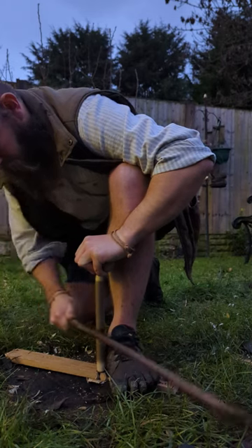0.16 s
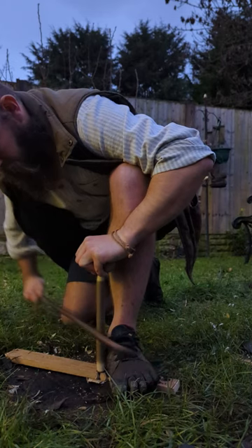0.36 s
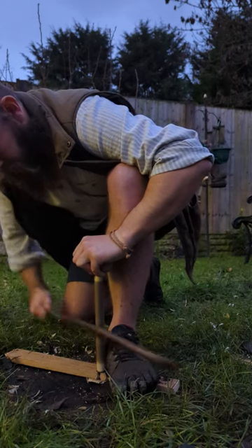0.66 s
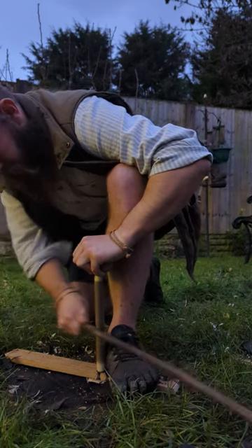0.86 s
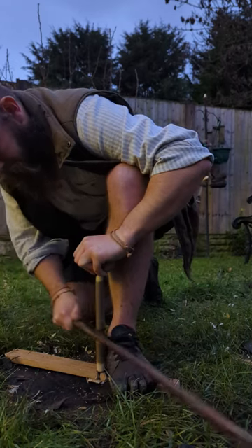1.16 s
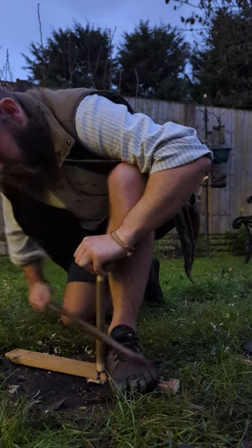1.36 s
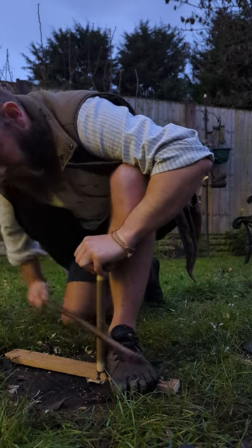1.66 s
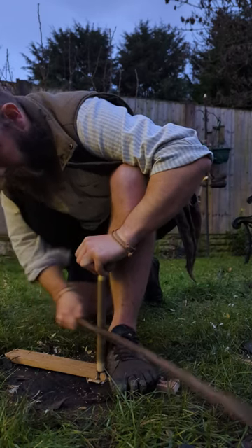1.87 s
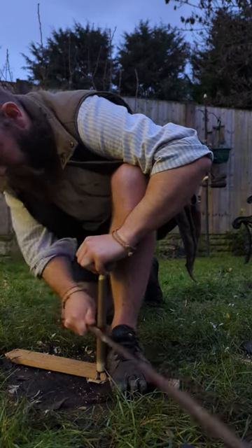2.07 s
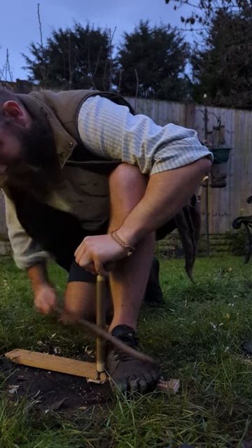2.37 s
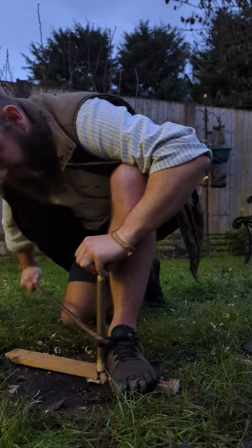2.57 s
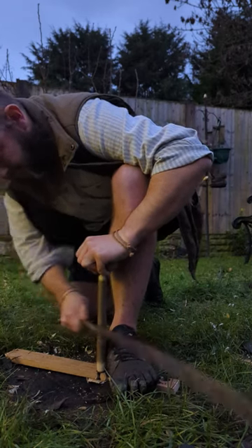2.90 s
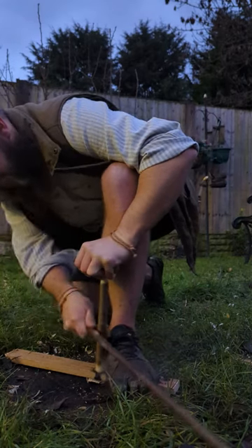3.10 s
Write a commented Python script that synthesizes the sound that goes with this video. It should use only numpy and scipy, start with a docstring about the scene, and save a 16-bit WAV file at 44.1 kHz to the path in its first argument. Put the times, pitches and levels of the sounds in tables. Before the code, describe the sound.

Close outdoor sound of a bow drill: dry, breathy wood rubbing swells and dips about twice a second, sometimes catching in clustered wooden clicks, slightly toward the right, over a soft distant engine hum and low rumble.

```python
"""Bow drill on a lawn

A bow spins a wooden spindle to and fro in the socket of a board; the rub dies at each turn of the bow.
Tiny random clicks hiss through the resonances of spindle and board. The tip catches in dull wooden ticks,
made of short slips that set the board ringing, and the board groans in short dying tones.
A distant engine is one low wavering tone, over an outdoor rumble of shaped noise.
Two close microphone ports hear the drill from the right: its sound comes later at the left port.
"""
import sys
import numpy as np
from scipy import signal
from scipy.fft import rfft, irfft
from scipy.io import wavfile

SR = 44100
rng = np.random.default_rng(int(sys.argv[2]) if len(sys.argv) > 2 else 0)


def materialize(psi):
    """Save the field psi as 16-bit PCM at rate SR to the path in sys.argv[1].

    A 1-D psi becomes a single channel; in a 2-D psi each row is a channel.
    """
    bounded = np.clip(np.atleast_2d(psi).T, -1, 1)
    quanta = np.round(bounded * 32767).astype(np.int16)
    wavfile.write(sys.argv[1], SR, quanta)


N = 142884


def amp(db):
    """Turn dB into a gain."""
    return 10 ** (np.asarray(db) / 20)


def rms_one(x):
    """Scale to an average strength (rms) of 1."""
    return x / np.sqrt(np.mean(x ** 2) + 1e-20)


def in_time(rows):
    """Draw straight lines through the rows of a timed table, one curve per column."""
    s, *columns = np.transpose(rows)
    return [np.interp(np.arange(N) / SR, s, c) for c in columns]


def at_hz(points, hz):
    """Read a frequency table in even steps of pitch (log frequency)."""
    table_hz, values = np.transpose(points)
    return np.interp(np.log(hz), np.log(table_hz), values)


def drift(rate):
    """Slow random wander around 0: noise smoothed to about `rate` Hz, worked out every 40 samples."""
    pole = np.exp(-80 * np.pi * rate / SR)
    noise = rng.standard_normal(N // 40 + 2002)
    slow = signal.lfilter([1], [1, -2 * pole, pole * pole], noise)[2000:]  # skip the settling
    return np.interp(np.arange(N) / 40, np.arange(len(slow)), rms_one(slow - slow.mean()))


def ring(clicks, hz, t60):
    """A click of height 1 starts a dying sine; t60 is the time in s to fall by 60 dB."""
    decay, w = 1000 ** (-1 / (t60 * SR)), 2 * np.pi * hz / SR
    return signal.lfilter([0, np.sin(w)], [1, -2 * decay * np.cos(w), decay * decay], clicks + 1e-18)


def pan(left_minus_right_db):
    """Gains for left and right, half the difference each way."""
    return amp([[left_minus_right_db / 2], [-left_minus_right_db / 2]])


def from_right(pair, lag):
    """Sound from the right reaches the left port `lag` samples later."""
    return np.array([np.roll(pair[0], lag), pair[1]])


# speed of the spindle, told by how loud its rub is; it dips at each turn of the bow: (t/s, level/dB)
SPIN = [(0.0, -62), (0.04, -53.5), (0.11, -48.5), (0.13, -48), (0.23, -44.5), (0.41, -42.5), (0.45, -45),
        (0.5, -53), (0.51, -60), (0.54, -73), (0.6, -50), (0.68, -43), (0.94, -45), (1.02, -63.5),
        (1.05, -61), (1.09, -53), (1.16, -46), (1.5, -42.5), (1.52, -47), (1.55, -60), (1.6, -70.5),
        (1.66, -49), (1.82, -42.5), (1.92, -45), (1.94, -43), (2.08, -63.5), (2.26, -44.5), (2.45, -41),
        (2.54, -43.5), (2.55, -48), (2.58, -62), (2.62, -68), (2.65, -56), (2.68, -48), (2.78, -42.5),
        (2.94, -44), (3.01, -40.5), (3.09, -51.5), (3.15, -71), (3.19, -52), (3.21, -52), (3.24, -47)]


def spindle_speed():
    """The faster the spindle turns, the louder it rubs: a gain through the strokes."""
    s, db = np.transpose(SPIN)
    return in_time(np.c_[s, amp(db)])[0]


# colour of the rub through the strokes, before each band's own gain:
# (t/s, finest hiss level/dB, spindle ring level/dB, board ring level/dB, board rumble level/dB)
COLOUR = [(0, -4.5, -4, -5, -6), (.15, -2, -4, -6, -14), (.3, -4.5, -4.5, -4, -15),
          (.42, -3.5, -3, -2, -4.5), (.5, -7, -2.5, -1, -4), (.6, -4.5, -6, -5, -10),
          (.69, -3.5, -7, -4.5, -8), (.8, -2.5, -6, -3.5, -9), (.95, -5, -7.5, -3, -7),
          (1.1, -5, -3.5, -6, -10), (1.2, -3, -3.5, -6, -14), (1.3, -4, -8, -7, -13),
          (1.36, -2, -4.5, -3, -4.5), (1.5, -5, -3, -2, -5.5), (1.66, -6, -4.5, -5.5, -6.5),
          (1.77, -6, -4, -6.5, 2.7), (1.82, -8, -9, -7.5, -7), (1.89, -4.5, -6.5, -8, -1),
          (1.97, -5, -7.5, -8.5, -7), (2.1, -6.5, -11, -8, -13), (2.24, -6.5, -4, -6.5, -18),
          (2.33, -7.5, -8, -7.5, -14.5), (2.45, -5, -2, -1, -3.5), (2.55, -4, -5.5, -0.5, 0.5),
          (2.68, -4.5, -4.5, -4.5, -0.5), (2.78, -6.5, -5.5, -5, -3.5), (2.93, -6.5, -6.5, -7.5, -2),
          (3.01, -3, -11.5, -9.5, -12.5), (3.1, -6.5, -10, -7.5, -18), (3.24, -5.5, -6, -1.5, -21)]


def stroke_colour():
    """The balance of fine hiss, spindle, board and rumble changes through each stroke."""
    return in_time(COLOUR)


# moments when the bow reverses: (t/s)
TURNS_S = [.54, 1.04, 1.59, 2.08, 2.61, 3.14]
GRAINS_PER_S, GRAIN_SPREAD_DB = 9000, 2  # average rate of each click stream; scale of the random boosts


def rub(resonances, patchy_db, patch_rate):
    """Friction clicks, partly the same at both ports, pass through flickering resonances; rms 1."""
    shape = (2, 3, N)  # two sets of clicks, each with a shared, a left and a right stream
    happens = rng.random(shape) < GRAINS_PER_S / SR
    boost = amp(GRAIN_SPREAD_DB * rng.exponential(1, shape))
    grains = happens * rng.standard_normal(shape) * boost
    returning = np.searchsorted(TURNS_S, np.arange(N) / SR) % 2  # 1 on every second stroke
    out, together = 0, drift(24)
    for k, (hz, width_hz, left_db, right_db, alike, return_db) in enumerate(resonances):
        shared, left, right = grains[k % 2]  # neighbouring resonances take different sets
        alike = np.clip(alike, 0, 1)
        pair = np.sqrt(alike) * shared + np.sqrt(1 - alike) * np.array([left, right])
        edges_hz = [hz - width_hz / 2, hz + width_hz / 2]
        sos = signal.butter(2, edges_hz, "band", fs=SR, output="sos")
        balanced = signal.sosfilt(sos, pair) * amp([[left_db], [right_db]])
        flicker_db = patchy_db * (0.32 * together + drift(patch_rate) + 0.26 * drift(7.5))
        out = out + balanced * amp(flicker_db + return_db * returning)
    return rms_one(out)


# rubbed resonances of the hiss, the finest hiss and the spindle, levels relative within each table:
# (f/Hz, width/Hz, left level/dB, right level/dB, left-right likeness/0-1, return stroke change/dB)
HISS = [(3420, 900, -11.5, -19.5, 0.27, -2), (4066, 760, -14, -8.5, 0.9, 2),
        (4720, 700, -9.5, -16, 0.19, -1.6), (5560, 520, -16, -8, 0.31, 0),
        (6157, 660, -12, -2.5, 0.43, -4.4), (6500, 380, -2, -1.5, 0.29, 0.5),
        (6920, 1050, -20.5, -3.5, 1, 2), (7950, 620, -9, -10, 0.24, 1.5), (8653, 640, -8.5, -5.5, 0.47, 1)]
FINE = [(10150, 2000, 0, -3, 0.33, -0.27), (11750, 1100, -.1, 2, 0.25, -0.12),
        (12900, 900, 5, -0.5, 0.17, -1.3), (14550, 990, 0, 2, 0.14, 0.52),
        (14400, 870, -4.5, -5, 0.34, 0.3)]
SPINDLE = [(1926, 360, -9.5, -9, 0.74, .1), (2246, 550, -10, -3.5, 0.5, -0.14),
           (2636, 262, -8, 1.5, 0.39, 0.062), (2824, 100, -0.5, -4, 0.17, 0.13)]
HISS_GAIN_DB, FINE_GAIN_DB, SPINDLE_GAIN_DB = 3.5, 3.7, 4


def tip_rub(fine_db, spindle_db):
    """The rubbing tip hisses high up while the spindle sounds a little lower."""
    hiss = amp(HISS_GAIN_DB) * rub(HISS, patchy_db=2.08, patch_rate=14.7)
    fine = amp(fine_db + FINE_GAIN_DB) * rub(FINE, patchy_db=1.53, patch_rate=26.0)
    spindle = amp(spindle_db + SPINDLE_GAIN_DB) * rub(SPINDLE, patchy_db=2.26, patch_rate=51.0)
    return hiss + fine + spindle


# rubbed resonances of the board's ring and of its rumble, levels relative within each table:
# (f/Hz, width/Hz, left level/dB, right level/dB, left-right likeness/0-1, return stroke change/dB)
BOARD = [(928, 310, -24.5, -10.5, 0.64, -4.5), (1001, 81, 0.5, -1, 0.62, 1.8),
         (1195, 280, -3.5, 0.5, 0.78, -1), (1490, 355, -1, 2.5, 0.86, 1)]
RUMBLE = [(307.5, 105, -1, 1, 1, 0.5), (390, 96, 3, -3.5, 1, -7), (578, 170, -2, 2, 0.96, 0.6),
          (713, 110, 0.5, 1.5, 1, -8)]
BOARD_GAIN_DB, RUMBLE_GAIN_DB = 1.5, -2


def board_rub(board_db, rumble_db):
    """The same kind of friction clicks make the board ring in the middle and rumble below."""
    board_ring = amp(board_db + BOARD_GAIN_DB) * rub(BOARD, patchy_db=0.9, patch_rate=52.0)
    rumble = amp(rumble_db + RUMBLE_GAIN_DB) * rub(RUMBLE, patchy_db=0.8, patch_rate=38.0)
    return board_ring + rumble


# tone of the distant engine, before its small random wavering: (t/s, f/Hz, level/dB)
DRONE = [(0.0, 63.9, -50), (0.56, 64.0, -56), (0.69, 63, -50), (1.09, 65.4, -53.5), (1.7, 64.8, -52),
         (2.04, 62.5, -47.5), (2.68, 55.8, -53), (2.92, 56.8, -54.5), (3.04, 57.7, -70), (3.17, 65.4, -73),
         (3.21, 66, -73), (3.24, 65.4, -60.5)]
DRONE_WAVER_DB = 2


def drone():
    """The engine is one low sine whose pitch and loudness waver."""
    hz, db = in_time(DRONE)
    level = np.sqrt(2) * amp(db + DRONE_WAVER_DB * drift(20.0))  # root 2: the table gives rms
    phase = 2 * np.pi * np.cumsum(hz + 0.6 * drift(8.1)) / SR
    return level * np.sin(phase)


# colour of the outdoor noise, relative: (f/Hz, level per Hz/dB)
AIR = [(20, -49), (33, -30), (48, -3), (75, 3.5), (110, 2.9), (262, -2), (437, -9), (912, -14), (1520, -16),
       (2380, -25), (5200, -26), (7000, -44.5), (9600, -66.5), (15500, -57.5)]
# how alike the outdoor noise is at both ports: (f/Hz, likeness/0-1)
AIR_LIKENESS = [(60, 1.0), (130, 0.99), (290, 1), (640, 0.4), (1410, 1), (3100, 0.16), (6820, 1),
                (15000, 0.1)]
# balance of the outdoor noise: (f/Hz, left minus right level/dB)
AIR_PAN_DB = [(60, 1.5), (300, -3), (1500, 7.5), (5000, -2.5), (10000, -10)]
# rise and fall of the low rumble; only the change around its mean counts: (t/s, level/dB)
RUMBLE_SWELL = [(0.0, -64), (0.32, -56), (1.05, -59), (1.52, -54), (1.61, -62), (1.7, -55.5), (2.42, -57.5),
                (2.47, -64), (2.52, -48.5), (2.57, -56.5), (3.22, -60), (3.24, -56)]
AIR_DB = -53.5  # rms of the whole
AIR_SWELL_DB, AIR_SWELL_BELOW_HZ = 1.06, 240  # extra random wavering; the part that swells


def air():
    """Outdoor noise: a low rumble that swells and a steady hiss, with likeness varying by pitch."""
    hz = np.maximum(np.fft.rfftfreq(N, 1 / SR), 10)
    mid, side = rfft(rng.standard_normal((2, N)))
    alike = np.clip(at_hz(AIR_LIKENESS, hz), -1, .995)
    pan_db = at_hz(AIR_PAN_DB, hz) / 2
    pair = np.sqrt(1 + alike) * mid + np.sqrt(1 - alike) * side * [[1], [-1]]
    pair = pair * amp([pan_db, -pan_db]) * amp(at_hz(AIR, hz))
    low = 1 / (1 + (hz / AIR_SWELL_BELOW_HZ) ** 4)
    rumble_db, = in_time(RUMBLE_SWELL)
    swell = amp(rumble_db - rumble_db.mean() + AIR_SWELL_DB * drift(4.9))
    rumble = irfft(pair * low, N) * swell
    hiss = irfft(pair * (1 - low), N)
    return amp(AIR_DB) * rms_one(rumble + hiss)


# the tip catches, levels before the gains below:
# (t/s, level/dB, slip f/Hz, bright edge over that level/dB)
CATCHES = [(0.305, -28, 1460, 0), (0.365, -26, 1190, -13), (0.384, -42, 1160, -9), (0.401, -39, 1460, -10),
           (0.427, -24.5, 1360, -19), (0.445, -27, 1280, -14), (0.658, -40, 1130, -12),
           (0.685, -35, 1510, -17), (0.73, -43, 920, -10), (0.754, -37, 1070, -12), (0.835, -42, 1120, -15),
           (0.938, -39, 1325, -12), (1.345, -22.5, 1270, -1.5), (1.371, -32, 824, -10),
           (1.387, -32, 900, -17), (1.406, -29.5, 1020, -20), (1.413, -30, 1240, -23),
           (1.428, -22, 1330, -21), (1.446, -25, 870, -9), (1.479, -27, 1480, -15), (1.487, -35, 1240, -16),
           (1.494, -21, 1294, -28), (1.725, -36, 1493, -5), (1.756, -27.5, 1480, -15),
           (1.774, -30.5, 1470, -16), (1.818, -27, 1640, -10), (1.859, -30, 1300, -3),
           (1.95, -38.5, 1390, -12), (2.35, -28.5, 1140, -14), (2.36, -31, 1420, -17),
           (2.393, -28, 980, -15), (2.402, -34, 1520, -12), (2.415, -23.5, 1055, -10.5),
           (2.42, -35, 856, -14), (2.439, -25, 1290, -11), (2.452, -19, 1350, -2.5),
           (2.465, -24, 1540, -17), (2.484, -24.5, 956, -8), (2.498, -24, 1150, -24),
           (2.508, -15.5, 1426, -34), (2.713, -34, 1190, -5), (2.735, -31.5, 1160, -16),
           (2.746, -28, 1480, -17), (2.754, -26.5, 1560, -12), (2.771, -36, 1536, -13),
           (2.78, -35, 1544, -15), (2.799, -32, 1450, -17), (2.833, -22.5, 1530, -21),
           (2.876, -22, 1420, -11)]
# ways the board rings when a slip shakes it: (f/Hz, relative level/dB, time to fall 60 dB/s)
MODES_STRUCK = [(292, -10, 0.018), (595, -2.5, 0.012), (886, -2, 0.022), (963.4, -8.5, 0.011),
                (1147, -1, 0.021), (1333, -0.5, .014), (1472, 5, 0.013)]
CATCH_GAIN_DB, EDGE_GAIN_DB, CATCH_PAN_DB = -35.5, -12, -3.5  # drive into the ringing; left minus right
SMALL_CATCHES_PER_S = 90  # where the board rings 5 dB under its loudest
SMALL_CATCH_DB = 7.5  # least level over the board's ring
SLIP_S, SLIP_SKEW = .0024, 0.51  # skew under 1: the slip rises faster than it falls
EDGE_HZ, EDGE_SHARE, EDGE_T60_S = 2510, 0.42, .0055  # the edge lasts a share of the slip, then rings
EDGE_LEAD_S = .0009  # the edge sounds just before the board


def small_catches(board_db):
    """Small random catches, more of them and louder where the board rings louder."""
    draw = rng.random((400, 5))
    at = .01 + draw[:, 0] * (N / SR - .03)
    ring_db = board_db[(at * SR).astype(int)]
    wanted = SMALL_CATCHES_PER_S * N / SR * amp(1.3 * (ring_db - board_db.max() + 5))
    level_db = ring_db + SMALL_CATCH_DB + 6 * draw[:, 2]
    slip_hz = 850 + 650 * draw[:, 3]
    edge_db = -16 + 8 * draw[:, 4]
    return np.c_[at, level_db, slip_hz, edge_db][draw[:, 1] * 400 < wanted]


def catches(board_db):
    """At each catch a few cycles of slip shake the board, and a bright edge rings briefly."""
    t = np.arange(int(SLIP_S * SR)) / SR
    swell = np.sin(np.pi * (t / SLIP_S) ** SLIP_SKEW)
    sharp = t[:int(EDGE_SHARE * len(t))]
    edge = np.sin(np.pi * sharp / sharp[-1]) * np.sin(2 * np.pi * EDGE_HZ * sharp)
    lead = int(EDGE_LEAD_S * SR)
    slips, edges = np.zeros((2, N))
    for s, db, slip_hz, edge_db in np.vstack([CATCHES, small_catches(board_db)]):
        i = int((s - .0005) * SR)  # the slip starts just ahead of the listed time
        slips[i:i + len(t)] += amp(db + CATCH_GAIN_DB) * swell * np.sin(2 * np.pi * slip_hz * t)
        edges[i - lead:i - lead + len(edge)] += amp(db + edge_db + EDGE_GAIN_DB) * edge
    body = sum(amp(db) * ring(slips, hz, t60) for hz, db, t60 in MODES_STRUCK)
    return (body + ring(edges, EDGE_HZ, EDGE_T60_S)) * pan(CATCH_PAN_DB)


# the board grinds on the ground, levels before the gain below and the roughness: (t/s, level/dB, f/Hz)
GRINDS = [(0.315, -39.5, 689), (0.365, -43, 334), (0.684, -39.5, 555), (0.868, -42, 301),
          (1.157, -48.5, 278), (1.342, -39, 550), (1.427, -37, 654), (1.746, -32.5, 298), (1.858, -38, 298),
          (1.94, -38.5, 341), (2.349, -44, 225), (2.376, -40.5, 486), (2.413, -43, 584),
          (2.439, -37.5, 491), (2.765, -38, 564), (2.875, -37.5, 340)]
GRIND_RISE_S, GRIND_T60_S, GRIND_GAIN_DB, GRIND_PAN_DB = 0.0019, 0.08, -3, -0.5


def grinds():
    """Short low groans: each tone rises softly, then dies away with a rough flutter in loudness."""
    out, t = np.zeros(N + SR), np.arange(SR // 8) / SR
    shape = (1 - np.exp(-t / GRIND_RISE_S)) * 1000 ** (-t / GRIND_T60_S)
    shape = shape / shape.max()
    for s, db, hz in GRINDS:
        i = int(s * SR)
        out[i:i + len(t)] += amp(db + GRIND_GAIN_DB) * shape * np.sin(2 * np.pi * hz * t)
    roughness = amp(3.1 * drift(49.0))
    return out[:N] * roughness * pan(GRIND_PAN_DB)


LEFT_LAG, LEFT_LAG_BOARD = 5, 8  # samples: tip and spindle, board


def scene():
    """The drill sounds from the right, with the engine and the outdoor noise added."""
    spin = spindle_speed()
    fine_db, spindle_db, board_db, rumble_db = stroke_colour()
    tip = spin * tip_rub(fine_db, spindle_db)
    board = spin * board_rub(board_db, rumble_db)
    board = board + catches(20 * np.log10(spin) + board_db) + grinds()
    drill = from_right(tip, LEFT_LAG) + from_right(board, LEFT_LAG_BOARD)
    return drill + drone() + air()


CUTOFF_HZ = 15780


def record(dry):
    """A steep low-pass filter cuts the highest treble."""
    return signal.sosfilt(signal.ellip(14, .5, 75, CUTOFF_HZ, fs=SR, output="sos"), dry)


dry = scene()
out = record(dry)
materialize(out)
```